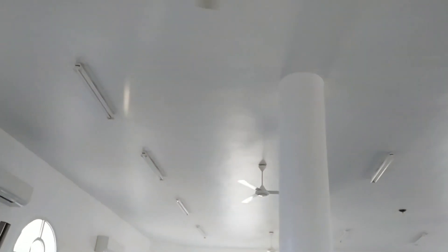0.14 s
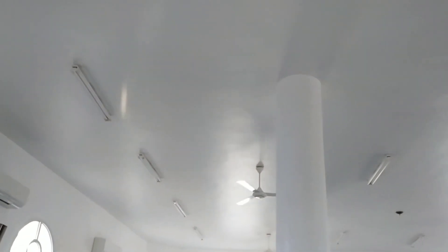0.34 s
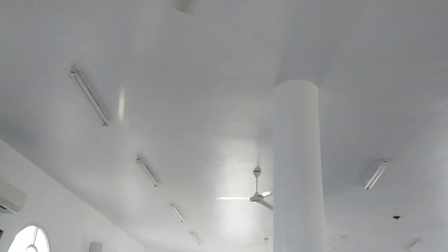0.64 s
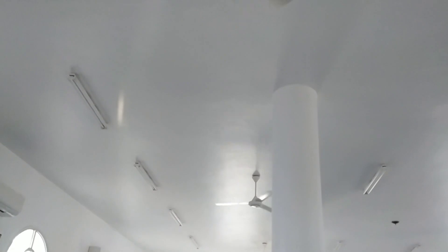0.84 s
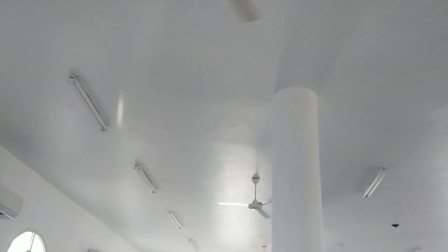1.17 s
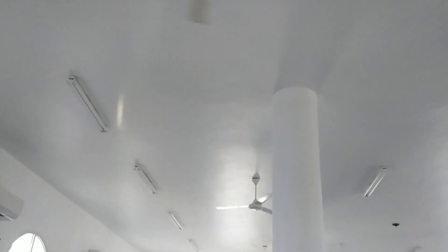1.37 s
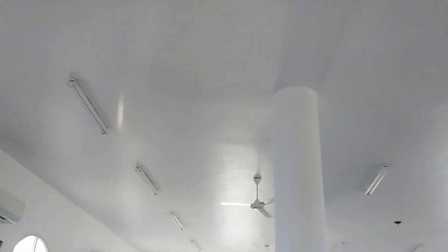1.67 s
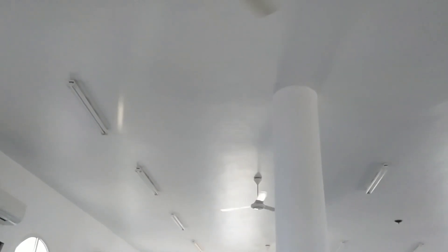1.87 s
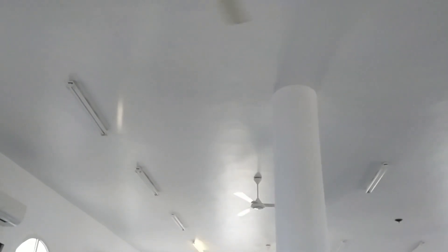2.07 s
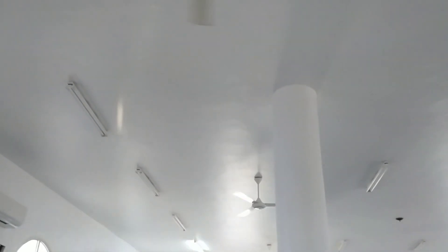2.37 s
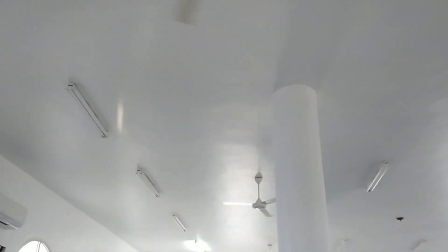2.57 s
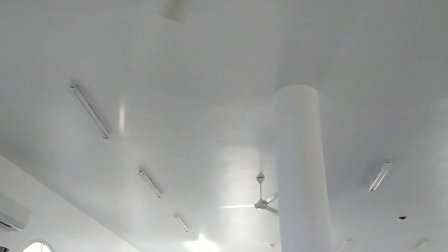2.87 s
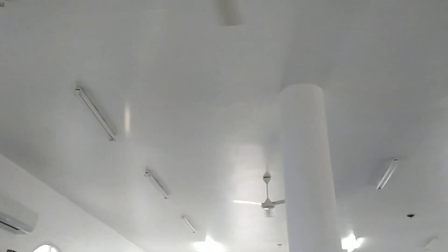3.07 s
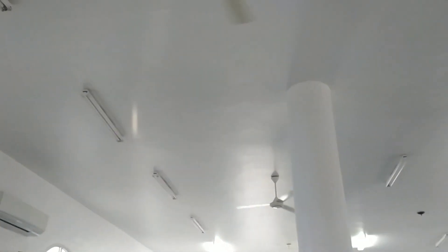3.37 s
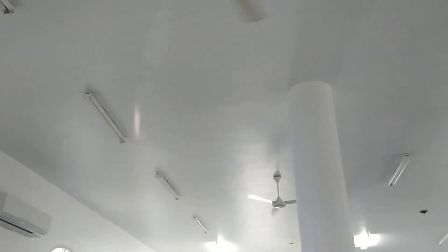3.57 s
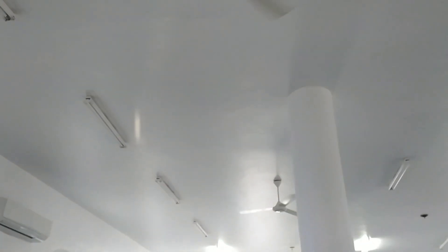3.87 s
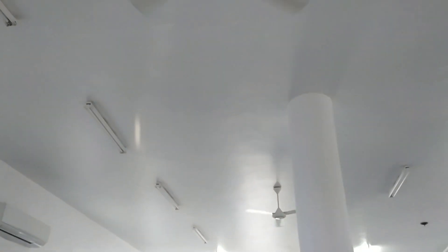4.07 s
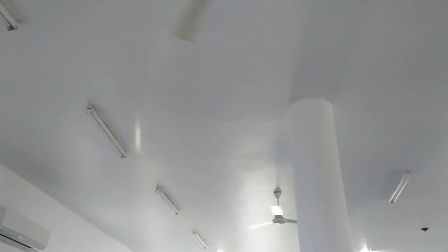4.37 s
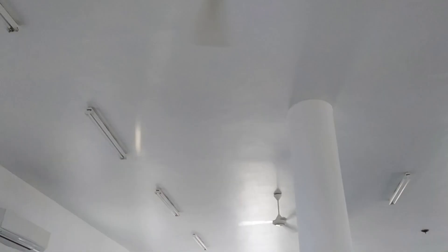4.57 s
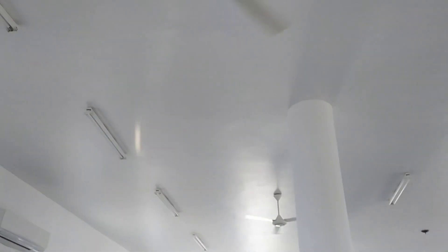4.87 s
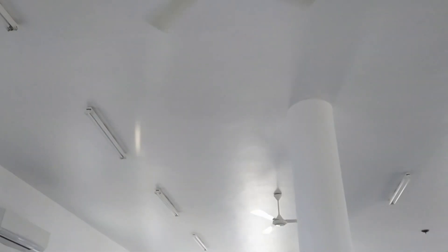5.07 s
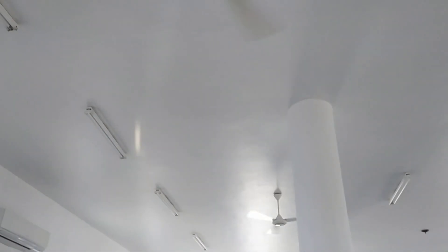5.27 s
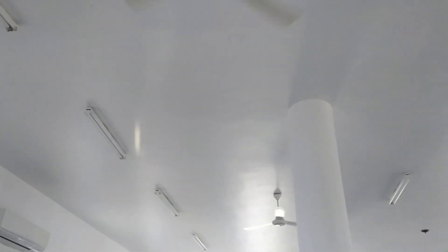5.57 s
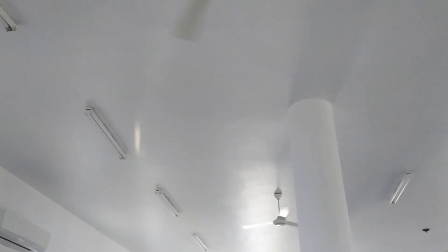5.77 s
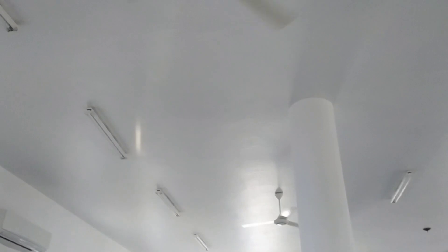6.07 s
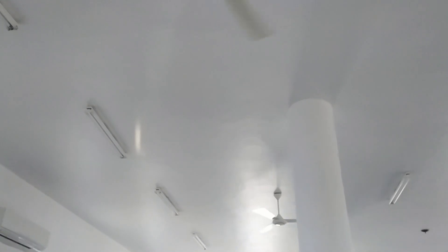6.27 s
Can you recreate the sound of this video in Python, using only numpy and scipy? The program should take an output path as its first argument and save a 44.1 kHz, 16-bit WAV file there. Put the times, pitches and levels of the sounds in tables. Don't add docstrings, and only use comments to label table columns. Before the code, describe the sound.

Six hard, bright snaps at uneven intervals ring out in a large bare hall over the soft rush and low hum of ceiling fans.

```python
import sys
import numpy as np
from scipy import signal
from scipy.fft import rfft, irfft, next_fast_len
from scipy.io import wavfile
from scipy.ndimage import uniform_filter1d, map_coordinates

SR = 44100
rng = np.random.default_rng(int(sys.argv[2]) if len(sys.argv) > 2 else 0)


def generate_wav(sig):
    pcm = np.round(np.clip(np.atleast_2d(sig).T, -1, 1) * 32767).astype(np.int16)
    wavfile.write(sys.argv[1], SR, pcm)


def convert_level_to_amplitude(level_db):
    exponent = np.asarray(level_db, float) / 20
    return 10 ** exponent


N = 283122


def unit(x):
    return x / np.sqrt(np.mean(x ** 2) + 1e-20)


def along(points, hz):
    f, v = np.transpose(points)
    return np.interp(np.log(hz + 1), np.log(f + 1), v)


def coloured(spectrum):
    return lambda hz: convert_level_to_amplitude(along(spectrum, hz))


def wobble(rate):
    knots = rng.standard_normal(int(N * rate / SR) + 4)
    return map_coordinates(knots, [np.arange(N) * rate / SR])


def filtered(x, response):
    m = next_fast_len(x.shape[-1] + 8192)
    spectrum = rfft(x, m) * response(np.fft.rfftfreq(m, 1 / SR))
    return irfft(spectrum, m)[..., :x.shape[-1]]


def add(track, sound, s):
    i = round(s * SR)
    part = sound[:, max(-i, 0):N - i]
    track[:, max(i, 0):max(i, 0) + part.shape[1]] += part


def ring(t, hz, db, t60, attack):
    t = np.maximum(t, 0)
    return convert_level_to_amplitude(db - 60 * t / t60) * (1 - np.exp(-t / attack)) ** 2 * np.sin(2 * np.pi * hz * t)


def landing(main_hz, t60_ms, low_hz, low_db, high_db):
    high_hz, t60 = 1.23 * main_hz, t60_ms / 1000
    main_s, main_db = .0003, -2.3
    again_s = main_s + 3 / main_hz
    return [(-.0003, high_hz, high_db - 10.5, .0036),
            (main_s, main_hz, main_db, t60),
            (again_s, main_hz, main_db - 4.5, t60),
            (.0006, low_hz, low_db, .0035),
            (.0010, high_hz, high_db, .0036)]


def snap(t, contacts, tile_db, thud_db):
    # (pitch [Hz], level [dB], t60 [s])
    tile_modes = [(2056, -11, 0.012), (2310, 1, 0.012), (2620, -1.5, .012)]
    thud_modes = [(493, -6, 0.018), (748, 0, 0.015), (884, -0.5, 0.019), (1147, -3, 0.03)]
    sound = sum(ring(t - late, hz, db + 9.5, t60, attack=.00027) for late, hz, db, t60 in contacts)
    sound += sum(ring(t - .0009, hz, tile_db + db + 15.5, t60, attack=.00053) for hz, db, t60 in tile_modes)
    sound += sum(ring(t - .0009, hz, thud_db + db + 15, t60, attack=.0016) for hz, db, t60 in thud_modes)
    return sound


def answer(main_hz, t60_ms, cancelled_hz, middle_db, bright_db, cancelled_db):
    hz = np.geomspace(1000, 16000, num=160)

    def band(centre_hz, octaves):
        return np.exp(-(np.log2(hz / centre_hz) / octaves) ** 2)

    tip_pitch = (t60_ms / 4) ** 2 * band(main_hz, 0.088)
    gain = band(2440, 0.173) + convert_level_to_amplitude(middle_db) * band(4130, .6) + convert_level_to_amplitude(-18)
    gain += convert_level_to_amplitude(bright_db) * (band(8850, 0.3) + tip_pitch)
    ripple_db = 1.5 * unit(uniform_filter1d(rng.standard_normal(len(hz)), size=4))
    gain *= convert_level_to_amplitude(ripple_db)
    loss_db = cancelled_db * np.exp(-((hz - cancelled_hz) / 190) ** 2)
    loss_db += -9 * (1 + np.tanh((hz - 11300) / 140)) / 2
    loss_db += -14 * np.maximum(hz - 13500, 0) / 2000
    return np.transpose([hz, 20 * np.log10(gain) + loss_db])


def hall(tint, slap_db):
    # (pitch [Hz], t60 [s])
    decay_times = [(500, 0.4), (2400, 1.317), (4500, 1.31), (8000, 0.93), (11000, 0.67), (15000, 0.094)]
    # (pitch [Hz], half the left-right difference [dB])
    lean = [(1300, 4), (2400, 5), (4200, 1.5), (15000, 3)]
    hz, t, z = signal.stft(rng.standard_normal((2, 6 * SR // 5)), SR, nperseg=512)
    wall_db = slap_db * np.exp(-((t - .105) / 0.015) ** 2)
    late = convert_level_to_amplitude(-60 * t / along(decay_times, hz)[:, None] + wall_db)
    decay = late + convert_level_to_amplitude(16.5 - 60 * t / 0.051)
    body = (t > .03) & (t < .2)
    decay /= np.sqrt(np.mean(decay[:, body] ** 2, axis=1, keepdims=True))
    colour = convert_level_to_amplitude(along(tint, hz) + np.outer([1, -1], along(lean, hz)))[..., None]
    tail = signal.istft(z * decay * colour, SR, nperseg=512)[1]
    tail /= np.sqrt(np.mean(tail[:, 3 * SR // 100:SR // 5] ** 2))
    return tail * np.clip((np.arange(tail.shape[1]) / SR - .002) / 0.00077, 0, 1)


def snaps():
    # (time [s], peak [dB], tile [dB], thud [dB], left over right [dB])
    hits = [
        (0.5971, -8, -26.5, -42, -2.5),
        (1.0642, -4, -28, -33.5, 3.5),
        (1.9851, -2.5, -33, -31.5, -11.5),
        (3.9856, -2.5, -22, -37, 0),
        (4.5612, -2.5, -24.5, -35, 3),
        (6.3299, -2, -22, -32.5, 2),
    ]
    # (main pitch [Hz], its t60 [ms], low pitch [Hz], low level [dB], high level [dB])
    tips = [(7920, 2, 4000, -7.5, -5), (7404, 3.1, 4950, -7.5, -7), (6420, 1.3, 4600, -9.5, -12),
            (7954, 1.7, 5700, -11, -8), (7140, 2.9, 4200, -18.5, -12.5), (7400, 1.4, 5200, -2.5, -7)]
    # (bright level [dB], tile [dB], the snap's 1.6 kHz knock [dB], delay [ms])
    bounces = [(-0.5, 7, -17, 4.8), (-12.5, -3, 3.5, 5.5), (-14, 7.5, -3.5, 5.1), (-5.5, -6.5, -21, 4.9),
               (-10, -2.2, -4, 4.9), (-15.5, -2, -17.5, 4.7)]
    # (rms [dB], middle [dB], bright [dB], depth at the cancelled pitch [dB])
    tails = [(-48, -4, -4.5, -16), (-47, -2.5, 0, -26), (-46.5, -3.5, 0, -25.5), (-44, -10.5, -9.5, -10.5),
             (-44.5, -13, -9.5, -13.5), (-46.5, -11.5, -1, -18.5), (-45.5, -6, -6.5, -1)]
    cancelled = [5330, 6230, 5680, 5450, 5500, 6220, 6100]
    # (time [s], peak [dB])
    ticks = [
        (1.0001, -39),
        (2.825, -44.5),
    ]
    lead_s = .001
    track, t = np.zeros((2, N)), np.arange(SR // 25) / SR - lead_s
    ears = t - np.array([[7 / 44100], [0]])
    for hit, tip, bounce_row, tail_row, gap_hz in zip(hits, tips, bounces, tails[1:], cancelled[1:]):
        s, db, tile_db, thud_db, pan_db = hit
        bright_db, again_db, knock_db, delay_ms = bounce_row
        tail_db, *tint = tail_row
        contacts = landing(*tip)
        grit = convert_level_to_amplitude(-5 - 60 * t / 0.012) * (1 - np.exp(-np.maximum(t, 0) / 0.0006))
        grit = grit * rng.standard_normal((2, len(t)))
        grit = filtered(grit, lambda f: (f / 6000) ** 1.1 / (1 + (f / 10500) ** 7.5) * (f > 700))
        knock = ring(ears - .0012, 1600, thud_db + knock_db + 13, 0.01, attack=0.00097)
        bounce_tile_db = tile_db + again_db - bright_db + np.array([[3], [-6]])
        bounce = snap(ears - delay_ms / 1000, contacts, bounce_tile_db, thud_db + 7.5)
        bounce = filtered(bounce, lambda f: 0.71 + 1.6 * np.exp(-((f - 9000) / 1100) ** 2))
        near = snap(ears, contacts, tile_db, thud_db) + grit + knock + convert_level_to_amplitude(bright_db) * bounce
        add(track, convert_level_to_amplitude(db - 0.5) * convert_level_to_amplitude([[pan_db / 2], [-pan_db / 2]]) * near, s - lead_s)
        add(track, convert_level_to_amplitude(tail_db + 1) * hall(answer(*tip[:2], gap_hz, *tint), slap_db=1), s)
    tail_db, *tint = tails[0]
    add(track, convert_level_to_amplitude(tail_db + 1.5) * hall(answer(7860, 3.0, cancelled[0], *tint), slap_db=0), -0.033)
    for s, db in ticks:
        tick = filtered(rng.standard_normal((2, len(t))), lambda f: (f / 7000) ** 3 / (1 + (f / 9500) ** 9))
        add(track, convert_level_to_amplitude(db + 1.5 - 60 * (t + lead_s) / 0.006) * tick, s)
    return track


def squeaks():
    # (time [s], length [s], pitch [Hz], rms [dB], overtones [dB])
    chirps = [
        (2.86, .07, 2170, -65, -40),
        (2.93, .05, 2260, -62, -40),
        (3.352, .045, 2260, -54, -36),
        (3.40, .15, 2280, -56, -40),
    ]
    track = np.zeros((2, N))
    for s, length, hz, db, overtones_db in chirps:
        t = np.arange(round(length * SR)) / SR
        turn = 2 * np.pi * hz * (t + 0.0147 * t * t / length)
        overtones = np.sin(2 * turn) + 2 * np.sin(4 * turn)
        swell = np.sin(np.pi * np.sqrt(t / length))
        tone = (swell * (np.sin(turn) + convert_level_to_amplitude(overtones_db) * overtones))[None]
        echo = signal.fftconvolve(tone, hall([(1000, 0)], slap_db=2.5), axes=1)
        add(track, convert_level_to_amplitude(db) * convert_level_to_amplitude([[3], [-3]]) * tone, s)
        add(track, convert_level_to_amplitude(db - 33) * echo, s)
    return track


def diffuse(gain, patchy_db=0):
    # (pitch [Hz], likeness [-1 to 1])
    likeness = [(60, 0.82), (130, 0.94), (290, 0.88), (640, 0.69), (1410, 0.25), (3100, 0.04),
                (6820, -0.03), (15000, -0.02)]
    pair = rng.standard_normal((2, N))
    if patchy_db:
        z = signal.stft(pair, nperseg=512)[2]
        field = uniform_filter1d(rng.standard_normal(z.shape[1:]), size=5, axis=0)
        field = uniform_filter1d(field, size=12, axis=1)
        pair = signal.istft(z * convert_level_to_amplitude(patchy_db * unit(field)), nperseg=512)[1][:, :N]

    def middle_and_side(hz):
        angle = np.arccos(np.clip(along(likeness, hz), -1, 1)) / 2
        return gain(hz) * [np.cos(angle), np.sin(angle)]

    mid, side = filtered(pair, middle_and_side)
    return unit(np.array([mid + side, mid - side]))


def cloth():
    # (start [s], length [s], level [dB])
    strokes = [(1.70, .1, -77), (2.707, 0.38, -71.5), (3.06, 0.14, -75), (3.30, 0.14, -71.5),
               (3.45, 0.2, -79), (3.622, 0.4, -73), (5.44, 0.39, -73), (5.83, 0.18, -81), (6.06, .28, -73)]
    # (pitch [Hz], level [dB per Hz])
    swish = [(5500, -21), (7200, -9.5), (9000, -6), (10600, -9), (11800, -27), (15000, -37.5)]
    t, gain = np.arange(N) / SR, np.zeros(N)
    for s, length, db in strokes:
        rise, fall = (t - s) / 0.21, (s + length - t) / 0.37
        gain += convert_level_to_amplitude(db) * np.clip(np.minimum(rise, fall) / length, 0, 1)
    return convert_level_to_amplitude(4.5) * uniform_filter1d(gain, size=2600) * diffuse(coloured(swish), patchy_db=1.2)


def fans():
    # (time [s], level [dB])
    air_strength = [
        (0.0, -59.5),
        (0.39, -60.5),
        (1.03, -57.5),
        (1.86, -59.5),
        (2.18, -55.5),
        (3.04, -56.5),
        (3.79, -54),
        (6.19, -50.5),
        (6.42, -50.5),
    ]
    # (pitch [Hz], level [dB per Hz])
    rumble = [(44, -38), (75, -13.5), (97, -5.5), (140, -8), (194, 0), (226, -4), (269, -2.5), (355, -6.5),
              (404, -9), (500, -15), (650, -44.5), (1100, -120)]
    rush = [(300, -41.5), (470, -5.5), (600, 0.5), (800, -2), (1000, -2), (1300, -6.5), (1600, -9),
            (2200, -39.5)]
    whirr = [(1000, -38.5), (1500, -4.5), (1900, 1), (2300, 3), (2700, -6), (3000, -14), (4000, -25),
             (5000, -46.5)]
    deep = [(8.8, -32.5), (15, 2.5), (27, 1), (54, -3.5), (70, -12), (80, -6), (100, -35.5), (180, -120)]
    hiss_colour = [(1760, -31), (3000, -6.5), (4130, -7), (5810, -14.5), (6190, -13.5), (6600, -12.5),
                   (8960, -6), (11700, -18), (14500, -16), (15500, -21), (16400, -47)]
    # (pitch [Hz], level over the deep noise's top [dB], width [Hz])
    hum = [(48.08, 4, 5.6), (92, -2, 10), (197.3, 8, 8.2), (558, -6.5, 42)]
    strength_db = np.interp(np.arange(N) / SR, *np.transpose(air_strength))
    mean_db = strength_db.mean()
    swell_db = strength_db - mean_db
    rumble_db = mean_db - 0.78 + 0.6045 * swell_db
    rush_db = strength_db + 0.46
    whirr_db = mean_db - 7 + 0.98 * swell_db
    swirl = wobble(3.097)
    air = convert_level_to_amplitude(rumble_db + 1.1 + .4 * swirl) * diffuse(coloured(rumble))
    air += convert_level_to_amplitude(rush_db + 0.64 * swirl + 0.48 * wobble(9)) * diffuse(coloured(rush), patchy_db=1.18)
    whirr_sides = convert_level_to_amplitude([[3.5], [-3.5]])
    air += convert_level_to_amplitude(whirr_db + .4 * swirl) * whirr_sides * diffuse(coloured(whirr), patchy_db=1.1)

    def deep_and_hum(hz):
        lines = sum(convert_level_to_amplitude(db) / (1 + (2 * (hz - centre) / width) ** 2) for centre, db, width in hum)
        return convert_level_to_amplitude(along(deep, hz)) + lines

    air += convert_level_to_amplitude(-64 + 4.5) * diffuse(deep_and_hum)
    hiss = convert_level_to_amplitude(-74.5 + 3.5) * diffuse(coloured(hiss_colour), patchy_db=3)
    return (air + hiss) * convert_level_to_amplitude([[.4], [-.4]])


def scene():
    return snaps() + squeaks() + cloth() + fans()


def low_pass(x):
    return signal.sosfilt(signal.butter(12, 16570, fs=SR, output="sos"), x)


def record(dry):
    limited = filtered(dry, lambda hz: 1 / (1 + (hz / 15700) ** 40))
    limited = limited / (1 + np.abs(limited / .9) ** 6) ** (1 / 6)
    return low_pass(limited)


dry = scene()
out = record(dry)
generate_wav(out)
```